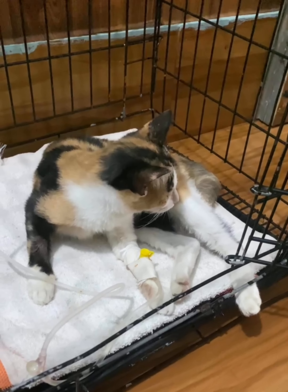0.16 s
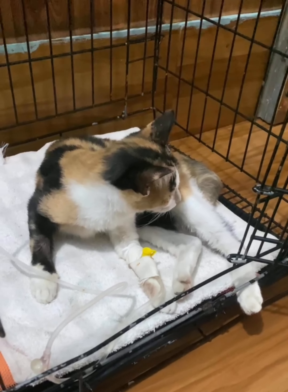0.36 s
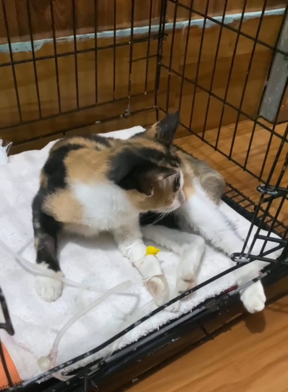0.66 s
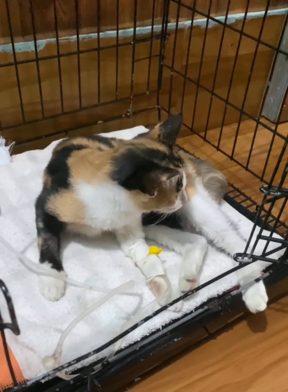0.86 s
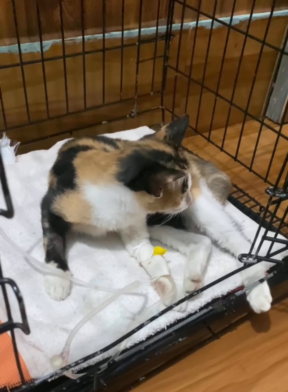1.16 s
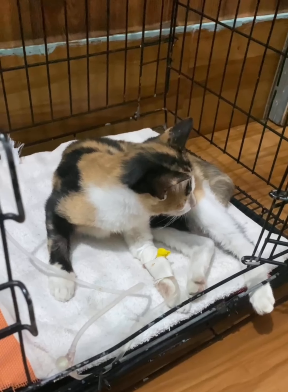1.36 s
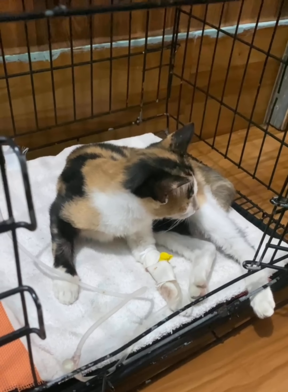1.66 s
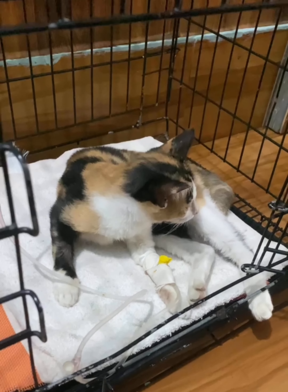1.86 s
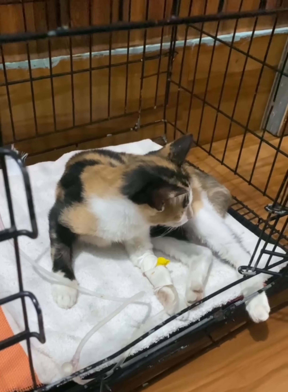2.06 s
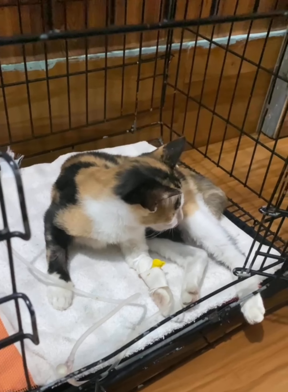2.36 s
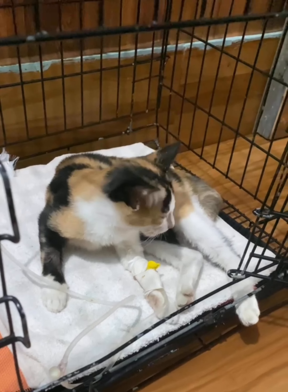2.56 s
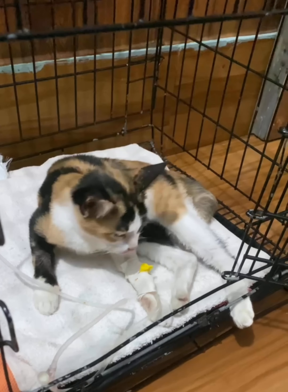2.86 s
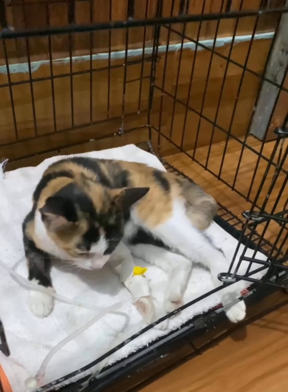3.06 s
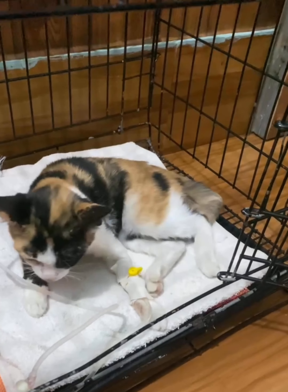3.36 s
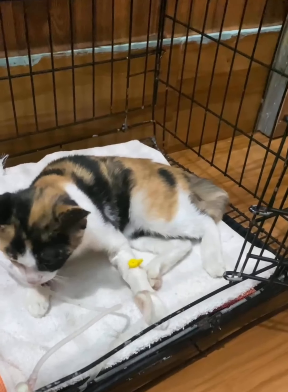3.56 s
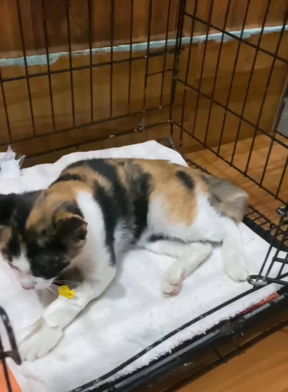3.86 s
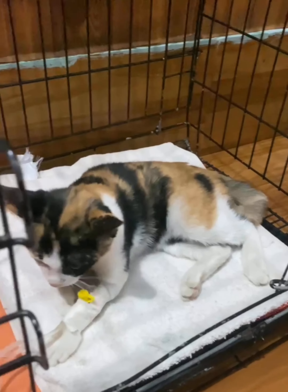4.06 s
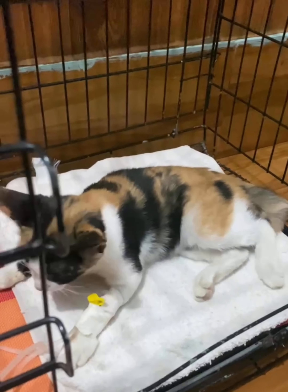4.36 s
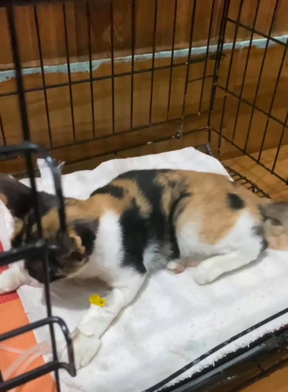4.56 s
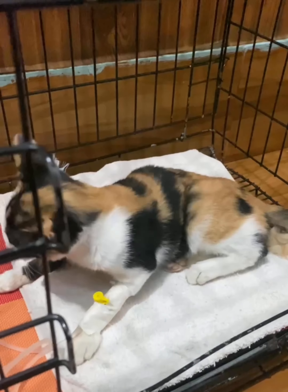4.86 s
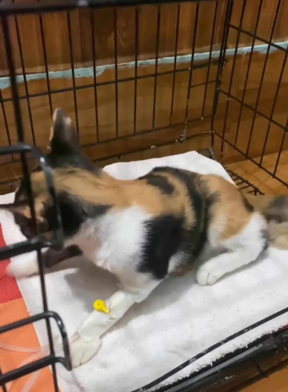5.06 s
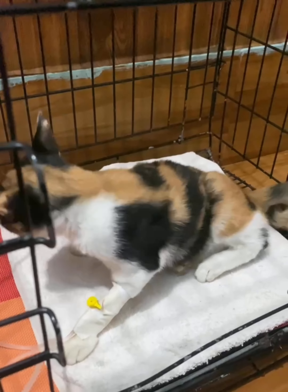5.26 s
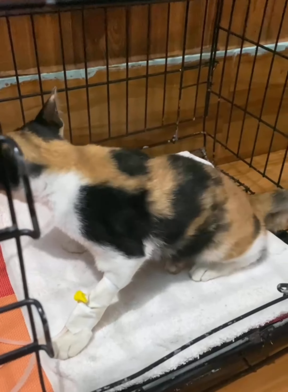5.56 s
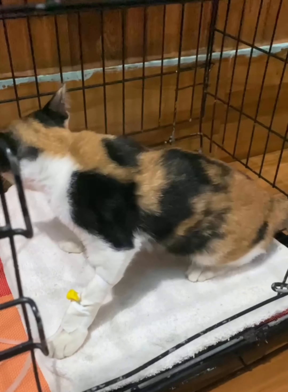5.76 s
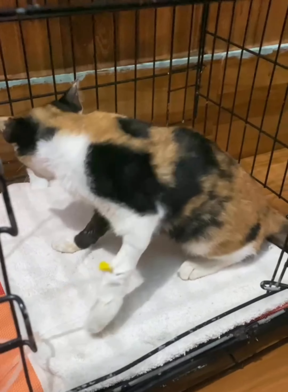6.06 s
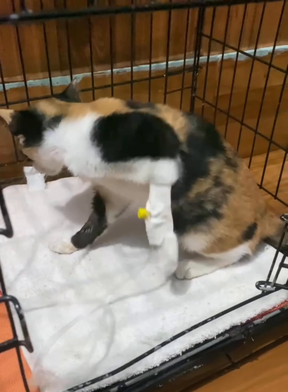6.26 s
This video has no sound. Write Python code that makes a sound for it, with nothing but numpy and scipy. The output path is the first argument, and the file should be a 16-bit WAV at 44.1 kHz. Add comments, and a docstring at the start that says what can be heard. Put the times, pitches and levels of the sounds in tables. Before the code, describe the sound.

A quiet wooden room holds a low, unsteady rumble and drone with a faint hiss, its deep notes slowly swelling and fading. Close by, a wire cage makes small metal sounds. A light tick at 0.3 s leads into a hard, dry click at 0.4 s with a dull tray thump; another tick and soft thump follow at 1.0 s, then a rattle with thin ringing at 1.2 s. Around 1.9 s comes the loudest snap, bright and sharp, with brief wire ring. A faint tick at 2.7 s sits in a lull. At 3.6-3.7 s and 4.0 s light clicks shimmer, with slight cloth friction. Small ticks dot 4.6-5.2 s. From 5.5 s bedding rustles more audibly as the cat shifts, with clearer clicks at 5.6, 5.7, 5.9 and 6.2 s, each leaving a short metallic tail.

```python
"""A wire pet cage clicks and ticks in a quiet wooden room as its door and latch are touched and a cat shifts.
Clicks are bursts of rattling noise through resonances; panel shakes and singing wires are decaying sines.
Dull sine thumps come from the floor tray, and grainy noise is paws and tubing dragging over bedding.
Low rumble from outside (filtered noise) makes the room drone on a few wavering sine notes, over faint hiss.
A phone with two ports listens close by; most sounds are built as a port sum and a port difference."""
import sys
import numpy as np
from scipy import signal
from scipy.fft import rfft, irfft, next_fast_len
from scipy.io import wavfile
from scipy.ndimage import uniform_filter1d, map_coordinates

SR = 44100
rng = np.random.default_rng(int(sys.argv[2]) if len(sys.argv) > 2 else 0)


def to_wav(sig):
    """Store sig (one row per channel, or 1-D mono) as 16-bit WAV at the path in sys.argv[1].

    Samples outside -1..1 are clipped; the rate is SR.
    """
    pcm = np.clip(np.atleast_2d(sig), -1, 1) * 32767
    pcm = np.round(pcm).astype(np.int16)
    wavfile.write(sys.argv[1], SR, pcm.T)  # frames by channels


N = 282240
EVENT_N = SR // 2  # samples given to each cage event


def cage():
    """All the metal: rattling bursts, shaken panel and singing wires, partly reaching one port sooner."""
    metal = rattles() + panel_shakes() + singing_wires()
    return ports(metal[:, :N], lag_share=0.65)


# Rattling bursts, some with a fainter burst just before them. Each row: start in seconds, level in dB,
# knock pitch in Hz, knock sharpness as Q, frame, wire and treble levels in dB, rattle t60 in seconds,
# room level in dB, lift of the thin wires in dB.
RATTLES = [(0.296, -22, 1860, 6.4, -35.5, -38, -10.5, 0.011, -2.5, -10.5),
           (0.4193, -9.5, 1660, 2.8, -18, -32, 3, 0.013, -3.5, -7),
           (1.0174, -38, 2530, 1.8, -5.5, -4.5, -10, 0.075, 1.5, -4),
           (1.203, -42.5, 2570, 1.8, -10, -16, -18, 0.042, -6, 2),
           (1.2112, -25.5, 2520, 1.5, -20, -7, -23.5, 0.063, -1.5, 2),
           (1.236, -35, 3000, 1.6, -11, -9, -29, 0.015, -10, 9.5),
           (1.517, -48.5, 2560, 14, -24, -17, -8.5, 0.072, 2, -2),
           (1.7658, -52, 2760, 9.7, -6, -15, -15, 0.16, -11, 5),
           (1.864, -45.5, 2921, 3.3, -31.5, -17, -23, 0.04, -7, -3.5),
           (1.8718, -21.5, 2940, 4, -33, -2, -6.5, 0.05, -6, -3.5),
           (1.89, -29.5, 2923, 2.5, -28.5, -21, -15.5, 0.049, -11.5, 6.5),
           (1.8958, -4, 2840, 3.7, -19.5, -11.5, -2, 0.045, -5, -7.5),
           (1.925, -27.5, 3916, 2.3, -29, 2.5, -12, 0.055, 3, 7.5),
           (2.315, -44, 2760, 4.7, -15, -14.5, -11, 0.012, 5, -3.5),
           (2.6835, -31, 1830, 6.8, -18, -25, -1, 0.053, 0.5, -9),
           (3.602, -59, 3220, 2, -21, -8, -12, 0.15, -4.5, 15),
           (3.626, -35.5, 2870, 1.3, -16.5, -13.5, -6, 0.019, 2.5, 8.5),
           (3.7308, -27, 4195, 12, -2, 7.5, 3, 0.034, 2.5, -6.5),
           (4.026, -32.5, 2650, 16.5, -9.5, -4, -6.5, 0.089, 3.5, -11),
           (4.5813, -49.5, 1900, 8.3, -32, -32, -29, 0.02, -9.5, -7),
           (4.6066, -44, 1890, 6.3, -32, -26, -22, 0.02, 0.5, -7.5),
           (4.7119, -45, 1810, 10, -28, -41, -34.5, 0.032, -10, -11),
           (4.947, -40, 1650, 4.2, -6, 0, 6.5, 0.037, 4, -5.5),
           (4.9813, -24.5, 1900, 12.6, -17, -13, -20, 0.02, 0, -9),
           (5.168, -51, 1544, 7.8, -19, -30, -23, 0.062, -4, 7),
           (5.178, -49, 1610, 4.1, 0.5, -10.5, -32, 0.027, 6, 8.5),
           (5.531, -60.5, 2900, 3.8, -17, -19, -32, 0.026, 0, 10),
           (5.5503, -39.5, 2740, 1.5, -35, -4, -18, 0.12, -1, -7),
           (5.568, -40.5, 2900, 8.3, -8, -2, -11, 0.027, -1, 10),
           (5.613, -30, 2600, 8, 0.5, -0.5, -2.5, 0.072, -7, 3),
           (5.7089, -22.5, 3070, 1.8, -10.5, -4.5, -6, 0.093, -5.5, -11),
           (5.826, -49, 3040, 1.8, -11, -8, -16.5, 0.057, 10, 18),
           (5.8724, -19, 2500, 2.3, -17, -9.5, -6, 0.056, -6, -6),
           (5.946, -55, 2500, 2.4, -18, 3, -20, 0.04, 7, 12),
           (6.111, -48, 2310, 4.6, -3.5, -30, -26, 0.048, 9, 0.5),
           (6.188, -18.5, 2550, 4.3, -29, -46, -4.5, 0.083, -3.5, 2)]
# Broad resonances of frame, wire and treble, in that order. Each row: centre in Hz, width in Hz, level in dB.
CAGE_BODY = [(1176, 650, 6.5), (5360, 5100, 0.5), (8210, 5640, 8)]
# Thin door wires. Each row: pitch in Hz, relative level in dB.
DOOR_WIRES = [(2195, -4), (2466, -9.5), (2549, 1), (2610, 0.5), (2688, 0.5), (2814, -7.5), (2909, -3.5),
              (3025, -0.5), (3137, -4.5), (3356, -1.5), (3500, -1.5), (3632, 1), (3838, -3.5), (3941, -0.5),
              (4075, -4), (4200, -4.5), (4418, -2), (4600, -3.5), (4720, -7.5)]
WIRE_WIDTH_HZ, WIRE_LIFT_DB = 13, 8
WIRE_SCATTER_DB = 2.5  # each burst favours other wires
# more thin wires, about as strong, at chance pitches
MESH_COUNT, MESH_LOW_HZ, MESH_HIGH_HZ, MESH_DB = 48, 2200, 7200, -1
SETTLE_S = 0.004  # the rattle grows uneven over this time
CRACK_DB = -6  # the sharp crack at the start, against the rattle after it


def rattles():
    """Each burst is a lumpy rattle and a sharp crack through its own knock, the cage body and the thin wires."""
    out, t = np.zeros((2, N + EVENT_N)), np.arange(EVENT_N) / SR
    mesh = [(hz, MESH_DB) for hz in rng.uniform(MESH_LOW_HZ, MESH_HIGH_HZ, MESH_COUNT)]
    wires = DOOR_WIRES + mesh
    for start, db, knock_hz, sharpness, *parts_db, t60, room_db, ring_db in RATTLES:
        # loose wires touch again and again
        unevenness = 3 * wobble(400, EVENT_N) + 3 * wobble(130, EVENT_N)
        bounces = amp(unevenness * np.clip(t / SETTLE_S, 0, 1))
        shape = amp(-60 * t / max(t60, .002)) * (1 - np.exp(-t / 0.0006))
        lifts_db = WIRE_LIFT_DB + ring_db + WIRE_SCATTER_DB * rng.standard_normal(len(wires))

        def colour(f, order=2):
            thin = 1 + sum(amp(level + lift) * peak(f, hz, WIRE_WIDTH_HZ)
                           for (hz, level), lift in zip(wires, lifts_db))
            body = sum(amp(part + level) * peak(f, hz, width) ** 2
                       for part, (hz, width, level) in zip(parts_db, CAGE_BODY))
            knock = peak(f, knock_hz, knock_hz / max(sharpness, .5)) ** order
            return thin * (knock + body)

        def sized(x):
            # the energy follows that of the rattle's envelope
            return 0.52 * x / np.linalg.norm(x, axis=-1, keepdims=True) * np.linalg.norm(shape)

        noise = rng.standard_normal((2, EVENT_N))
        rattle = sized(filtered(noise * bounces * shape, colour))
        # the walls hear the cage from all sides: a broader, even colour
        impulse = 1. * (t == 0)
        crack = sized(filtered(impulse, lambda f: colour(f, order=1)))
        burst = rattle + amp(CRACK_DB) * crack + amp(room_db) * room(crack[None])
        add_at(out, start, amp(db) * burst)
    return out


# The whole wire panel is shaken. Each row: start in seconds, level in dB, tilt in dB per octave about 1 kHz,
# ring time as a share of the usual.
SHAKES = [(1.211, -65, 6, 2.1), (1.896, -53.5, 10, 0.8), (3.6266, -52.5, 0.5, 1.6), (3.7332, -51, 6, 1.25),
          (4.0271, -53, 5.5, 1.6), (4.9473, -64, 3.5, 2.3), (5.8732, -66, -12.5, 0.8),
          (6.113, -60, 0.5, 1.5), (6.187, -63, 15, 0.6)]
# Modes of the wire panel. Each row: pitch in Hz, level in dB, t60 in seconds.
PANEL_MODES = [(598.4, -7, 0.83), (650, -7, 1), (758, -19, 0.5), (929, -12.5, 0.6), (1038, -10, 0.67),
               (1162, -16, 0.52), (1188, -10.5, 0.62), (1308, -14.5, 0.5), (1384, -13.5, 0.6),
               (1489, -6, .35), (1583, -14.5, 1.1), (1750, -16.5, 0.5), (1900, -16, 0.56),
               (2050, -15.5, 0.4), (2170, -14.5, 0.44), (2220, -16.5, 0.23), (2456, -12.5, 0.36),
               (2740, -13.5, 0.3)]
TWIN_SPREAD, TWIN_DB = .04, -1.5  # scatter as a share of each mode's pitch; level against the mode
SHAKE_ROOM_DB = -6.5  # gain of the room tail on the buzz


def panel_shakes():
    """The panel buzzes in its joints: every mode is a decaying sine that flutters in level and phase."""
    out, t = np.zeros((2, N + EVENT_N)), np.arange(EVENT_N) / SR
    onset = 1 - np.exp(-t / 0.0089)
    fade_out = np.clip((EVENT_N / SR - t) / .1, 0, 1)
    for start, db, tilt_db, ring_share in SHAKES:
        # three neighbouring wires beside each mode, dying twice as fast
        twins = [(hz * (1 + TWIN_SPREAD * rng.standard_normal()), level + TWIN_DB, t60 / 2)
                 for hz, level, t60 in PANEL_MODES * 3]
        buzz = np.zeros((2, EVENT_N))
        for hz, level, t60 in PANEL_MODES + twins:
            mode_db = level + tilt_db * np.log2(hz / 1000) - 60 * t / (t60 * ring_share)
            flutter_db = 5 * wobble(43, EVENT_N)
            cycles = hz * t + (0.3 * wobble(55, EVENT_N) + rng.random((2, 1))) / 1
            buzz += amp(mode_db + flutter_db) * np.sin(2 * np.pi * cycles)
        buzz *= onset * fade_out
        add_at(out, start, amp(db) * (buzz + amp(SHAKE_ROOM_DB) * room(buzz)))
    return out


# A few neighbouring wires are caught and sing on. Each row: start in seconds, pitch in Hz, level in dB,
# t60 in seconds.
SINGING_WIRES = [(1.214, 3530, -49, 0.42), (1.21, 1181, -52.5, 0.3), (1.212, 4650, -44.5, 0.16),
                 (1.21, 2540, -39.5, 0.068), (1.896, 3067, -33, 0.14), (1.896, 7120, -21, .06),
                 (1.897, 5550, -40.5, 0.25), (1.926, 3923, -45, 0.33), (1.926, 3630, -47.5, 0.13),
                 (3.732, 4110, -56.5, 0.32), (3.732, 3567, -69.5, 1), (4.028, 2570, -54.5, 0.17),
                 (5.552, 2900, -47.5, 0.12), (5.709, 3330, -53, 0.11), (5.873, 2593, -49, 0.37),
                 (5.872, 3790, -56.5, 0.38), (5.873, 6000, -58, 0.17), (5.871, 4660, -47, 0.17),
                 (6.187, 2560, -45.5, 0.19), (6.19, 7381, -28.5, 0.018), (6.191, 3080, -66, 0.22)]
RING_ROOM_DB = -9  # gain of the room tail on the singing


def singing_wires():
    """Each catch sets off four decaying sines, a little apart in pitch so that they beat."""
    out, t = np.zeros((2, N + EVENT_N)), np.arange(EVENT_N) / SR
    for start, hz, db, t60 in SINGING_WIRES:
        detune = .022 * rng.standard_normal((4, 1)) * [[0], [.5], [1], [1]]
        group_hz = hz * (1 + detune)
        flutter = np.array([wobble(55, EVENT_N) for wire in group_hz])
        cycles = group_hz * t + .2 * flutter[::-1] + rng.random((4, 1))
        level = amp(db + 4 * flutter - 60 * t / t60)
        sing = np.sum(level * np.sin(2 * np.pi * cycles), axis=0)
        direct = sing * [[1], [0]]  # in the port sum alone
        add_at(out, start, direct + amp(RING_ROOM_DB) * room(sing[None]))
    return out


# The floor tray is knocked. Each row: start in seconds, level in dB, pitch in Hz, t60 in seconds.
THUMPS = [(0.422, -38.5, 358, 0.041), (1.02, -43.5, 456, 0.086)]


def tray():
    """Short dull thumps: decaying low sines, added alike to both ports."""
    out, t = np.zeros(N), np.arange(SR // 5) / SR
    for start, db, hz, t60 in THUMPS:
        onset = 1 - np.exp(-t / 0.0012)
        thump = amp(db - 60 * t / t60) * np.sin(2 * np.pi * hz * t) * onset
        out[round(start * SR):][:len(t)] += thump
    return out


# Paws and tubing drag over the bedding. Each row: start in seconds, length in seconds, level in dB.
DRAGS = [(1.484, 0.37, -70), (2.99, 0.91, -94.5), (3.61, 0.31, -64.5), (4.585, 0.12, -70),
         (5.145, 0.07, -66), (5.553, 0.26, -55.5), (5.87, 0.51, -60.5)]
# Colour of the friction. Each row: frequency in Hz, relative level in dB.
CLOTH_COLOUR = [(400, -30), (900, -10), (2500, 0), (5000, -5), (9000, -3), (10300, -10), (11200, -40)]
DRAG_RISE_S, DRAG_FALL_S = .03, .05


def scrape():
    """Grainy friction: coloured noise in quick uneven lumps under each drag."""
    t = np.arange(N) / SR
    level = np.zeros(N)
    for start, length, db in DRAGS:
        rise = np.exp(np.minimum(4 * (start - t) / DRAG_RISE_S, 50))
        fall = np.exp(np.minimum(4 * (t - start - length) / DRAG_FALL_S, 50))
        level += amp(db) / (1 + rise + fall)
    lumps = amp(5 * wobble(35) + 4 * wobble(250))
    grains = unit(lumps * rng.standard_normal((2, N)))
    friction = unit(filtered(grains, lambda f: amp(along(CLOTH_COLOUR, f))))
    return ports(level * friction, lag_share=0)


# Colour of the rumble. Each row: frequency in Hz, relative level in dB.
RUMBLE_COLOUR = [(12, -12), (24, -4), (32, -1), (42, -1), (60, -3), (90, -1), (150, -8), (200, -18),
                 (300, -50)]
# The strongest note drifts. Each row: time in seconds, pitch in Hz, level in dB.
DRIFTING_NOTE = [(0, 135, -69), (.9, 135, -64), (1.55, 136, -48), (1.85, 135.1, -47.5), (2.07, 133.5, -71),
                 (2.2, 134.3, -49), (2.62, 131.6, -42), (2.78, 132, -44.5), (3.0, 132, -41.5),
                 (3.45, 130, -59), (3.9, 134, -47.5), (4.3, 135.9, -50.5), (4.6, 134, -53),
                 (5.15, 134, -49), (5.5, 135, -43.5), (6.2, 133.7, -49.5), (6.4, 129.8, -61)]
# Steady notes of the room. Each row: pitch in Hz, level in dB.
STEADY_NOTES = [(53, -61.5), (76.4, -53), (109, -57), (161.7, -67), (224, -71)]
# A note swells and fades again. Each row: middle in seconds, length in seconds, pitch in Hz, top level in dB.
SWELLS = [(1, 0.35, 76, -46), (1.95, 1.9, 54, -46), (2.3, 1.5, 161, -53), (3.12, 0.3, 160, -52),
          (4.17, 0.32, 76, -43), (4.06, 1.3, 102, -51.5), (5.55, 2.2, 112, -48.5), (5.52, 1.22, 225, -58),
          (5.4, 1.2, 52, -55), (6.2, 1.2, 88, -49)]
RUMBLE_DB = -49.5
WANDER_DB = 2.5  # slow chance in each steady note's level


def hum():
    """Rumble as low filtered noise, and the room's notes as sines in the port sum, nearly alike at both ports."""
    t = np.arange(N) / SR
    rumble = filtered(rng.standard_normal((2, N)), lambda f: amp(along(RUMBLE_COLOUR, f)))
    low = amp(RUMBLE_DB) * unit(rumble)
    low[0] += note(*curves(DRIFTING_NOTE))
    for hz, db in STEADY_NOTES:
        low[0] += note(hz, db + WANDER_DB * wobble(3.6))
    for middle, length, hz, db in SWELLS:
        swell = np.cos(np.pi * np.clip((t - middle) / length, -.5, .5)) ** 2
        low[0] += swell * note(hz, db)
    return ports(low, lag_share=0.41)


def note(hz, db):
    """One room note: a sine that wavers in pitch and level."""
    phase = 2 * np.pi * np.cumsum(hz + 0.9 * wobble(9)) / SR
    return np.sqrt(2) * amp(db + 2.2 * wobble(15)) * np.sin(phase)


# Room air in the sum of the ports. Each row: frequency in Hz, relative level in dB.
AIR_SUM = [(88, -44.5), (150, -11), (208, -21), (283, -16), (422, -23), (454, -25.5), (922, -29),
           (1070, -31), (1480, -34.5), (1680, -37), (1800, -37.5), (4160, -56.5), (4990, -74.5),
           (6790, -71), (11500, -91.5), (15000, -116), (22000, -120)]
# Room air in the difference of the ports. Each row: frequency in Hz, relative level in dB.
AIR_DIFFERENCE = [(88, -35), (150, -5.5), (269, -5), (417, -4), (510, -11.5), (559, 2), (708, -8),
                  (776, -1), (1340, -10), (3670, -18), (5480, -47.5), (8490, -40.5), (11800, -56),
                  (15300, -75), (22000, -120)]
AIR_DB, AIR_RISE_DB_PER_S = -60.5, 0.38


def air():
    """The room's faint hiss: slightly patchy noise, slowly rising, unlike at the two ports."""
    z = signal.stft(rng.standard_normal((2, N)), nperseg=512)[2]
    field = uniform_filter1d(rng.standard_normal(z.shape[1:]), size=6, axis=0)
    field = uniform_filter1d(field, size=10, axis=1)
    pair = signal.istft(z * amp(1.5 * unit(field)), nperseg=512)[1][:, :N]
    mid = amp(4.5) * unit(filtered(pair[0], lambda f: amp(along(AIR_SUM, f)) * (f > 120)))
    side = amp(-1.0) * unit(filtered(pair[1], lambda f: amp(along(AIR_DIFFERENCE, f))))
    level = amp(AIR_DB + AIR_RISE_DB_PER_S * np.arange(N) / SR)
    return level * np.array([mid + side, mid - side])


def room(sound):
    """Reverberation: a sound convolved with its own fresh tail."""
    n = sound.shape[1]
    return signal.fftconvolve(sound, echo(n), axes=1)[:, :n]


# Decay of the tails after each sound. Each row: frequency in Hz, t60 in seconds.
TAIL_DECAY = [(500, .35), (1300, .4), (4000, .4), (4900, .28), (5600, .38), (7300, .38), (8400, .16),
              (10800, .06)]
UNEVEN_DB = 5  # narrow bands of the tail swell and drop by chance


def echo(n):
    """A pair of noise tails, each frequency dying at its own speed, scaled to energy 1 in the first."""
    hz, t, z = signal.stft(rng.standard_normal((2, n + 256)), SR, nperseg=256)
    field = uniform_filter1d(rng.standard_normal(z.shape[1:]), size=24, axis=1)
    decay_db = 60 * t / along(TAIL_DECAY, hz)[:, None]
    tail = signal.istft(z * amp(UNEVEN_DB * unit(field) - decay_db), SR, nperseg=256)[1][:, :n]
    tail = tail * np.clip(np.arange(n) / SR / 0.0013, 0, 1)  # fades in over 1.3 ms
    return tail / np.linalg.norm(tail[0])


# Colour of the port sum. Each row: frequency in Hz, gain in dB.
PORT_SUM = [(300, 3.5), (4000, 4.5), (5000, -5), (6200, -1.5), (7500, -12), (8500, -21), (10000, -51),
            (12000, -38.5)]
# Colour of the port difference. Each row: frequency in Hz, gain in dB.
PORT_DIFFERENCE = [(30, -36), (70, -32.5), (130, -39.5), (350, -2), (620, -8), (1200, -1.5), (2000, 5),
                   (3500, 9), (5500, -0.5), (7500, -1), (9900, -4.5), (10800, -12), (12000, -1.5)]


def ports(pair, lag_share):
    """Left and right from port sum and difference; part of the difference is the sum arriving sooner on one side."""
    share = np.clip(lag_share, -1, 1)
    mid = filtered(pair[0], lambda f: amp(along(PORT_SUM, f)))
    # a quarter-cycle turn of the sum stands in for the lag
    lag = filtered(pair[0], lambda f: 1j * share * amp(along(PORT_DIFFERENCE, f)))
    spread = filtered(pair[1], lambda f: np.sqrt(1 - share ** 2) * amp(along(PORT_DIFFERENCE, f)))
    return np.array([mid + lag + spread, mid - lag - spread])


def amp(db):
    """Gain of a dB value."""
    return 10 ** (np.asarray(db) / 20)


def unit(x):
    """Scaled to rms 1."""
    return x / np.sqrt(np.mean(x ** 2) + 1e-20)


def along(points, hz):
    """Values between (Hz, value) points, on a log frequency axis."""
    f, v = np.transpose(points)
    return np.interp(np.log(hz + 1), np.log(f + 1), v)


def curves(rows):
    """One value per sample for each column after the time."""
    s, *cols = np.transpose(rows)
    return [np.interp(np.arange(N) / SR, s, c) for c in cols]


def wobble(rate, n=N):
    """A smooth random curve of n samples, rate knots a second."""
    knots = rng.standard_normal(int(n * rate / SR) + 4)
    return map_coordinates(knots, [np.arange(n) * rate / SR])


def filtered(x, response):
    """x times a complex response of frequency."""
    n = x.shape[-1]
    m = next_fast_len(n + 8192)
    return irfft(rfft(x, m) * response(np.fft.rfftfreq(m, 1 / SR)), m)[..., :n]


def peak(f, hz, width_hz):
    """One causal resonance, gain 1 at its top."""
    return 1j * f * width_hz / (hz * hz - f * f + 1j * f * width_hz)


def add_at(out, start, event):
    """Mixes a cage event in at its start in seconds."""
    out[:, round(start * SR):][:, :EVENT_N] += event


def scene():
    """Cage, tray, scraping and air, 0.4 dB down on the left and up on the right, with the hum left even."""
    near = cage() + tray() + scrape() + air()
    return near * amp([[-.4], [.4]]) + hum()


TOP_HZ = 12170


def record(dry):
    """The phone rounds off the loudest peaks, sits 2.5 dB lower, fades its top edge and cuts at its band limit."""
    soft = dry / (1 + np.abs(dry / .45) ** 3) ** (1 / 3)
    edge = [(11200, -2.5), (12100, -24.0)]  # Hz, dB
    return filtered(soft, lambda hz: amp(along(edge, hz)) * (hz < TOP_HZ))


dry = scene()
out = record(dry)
to_wav(out)
```